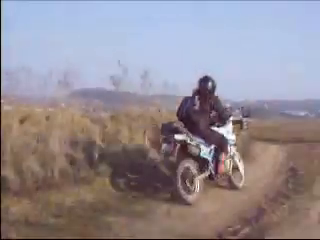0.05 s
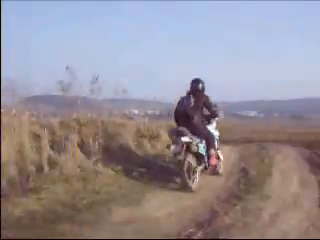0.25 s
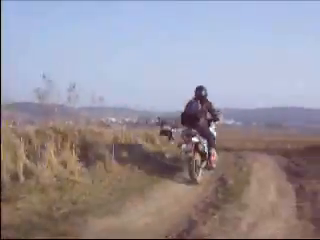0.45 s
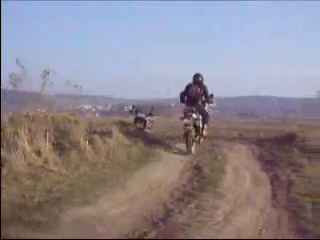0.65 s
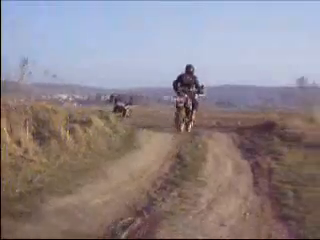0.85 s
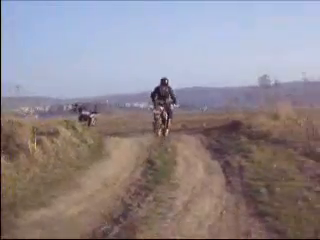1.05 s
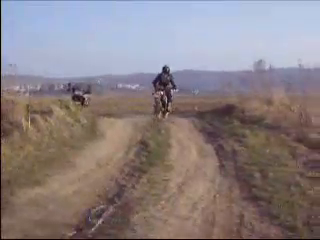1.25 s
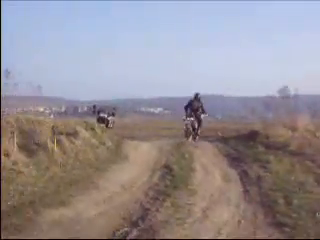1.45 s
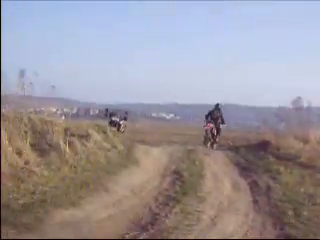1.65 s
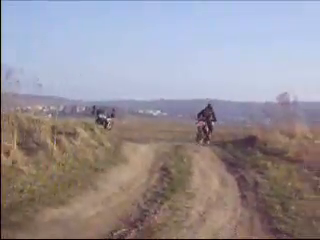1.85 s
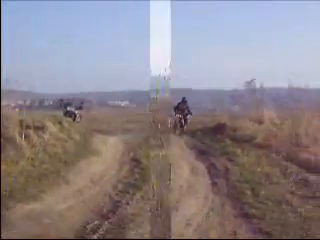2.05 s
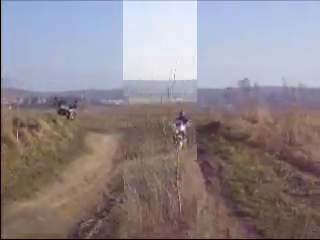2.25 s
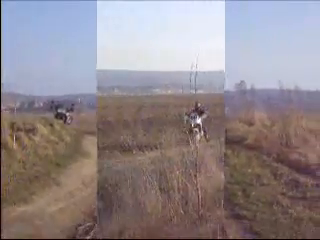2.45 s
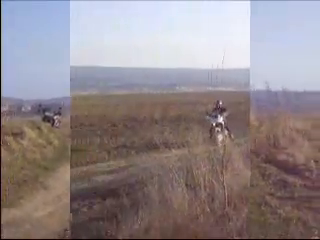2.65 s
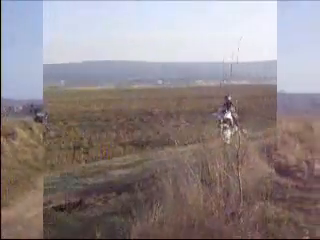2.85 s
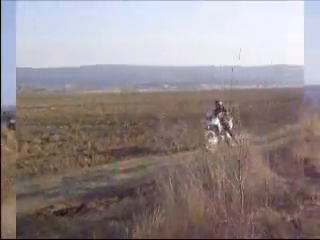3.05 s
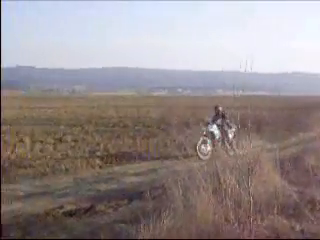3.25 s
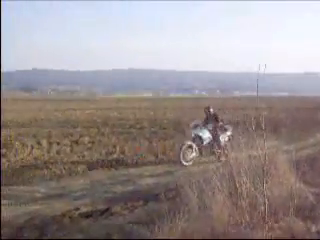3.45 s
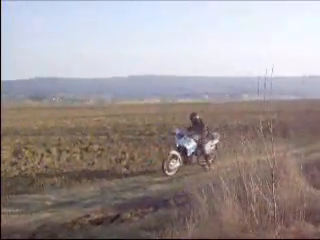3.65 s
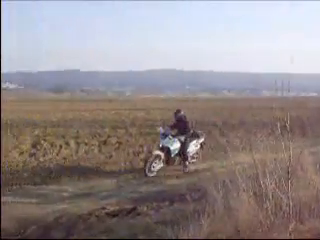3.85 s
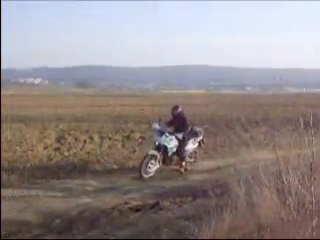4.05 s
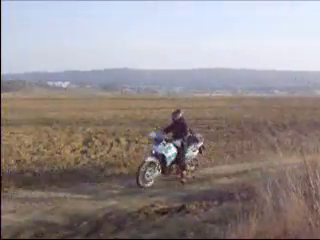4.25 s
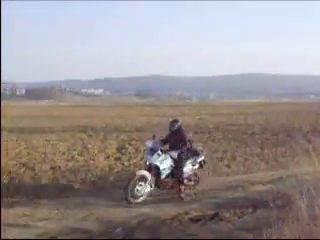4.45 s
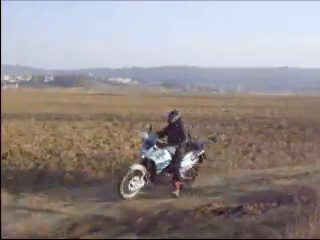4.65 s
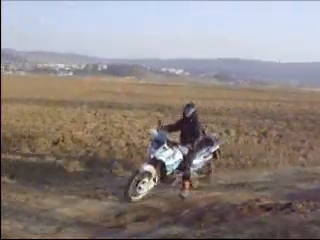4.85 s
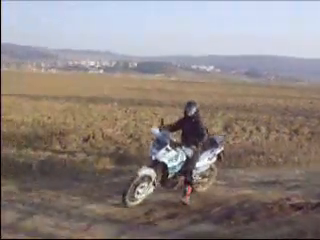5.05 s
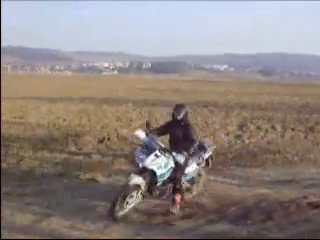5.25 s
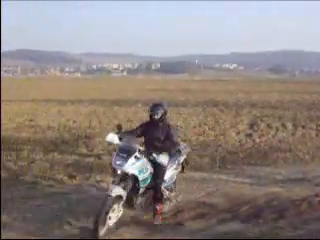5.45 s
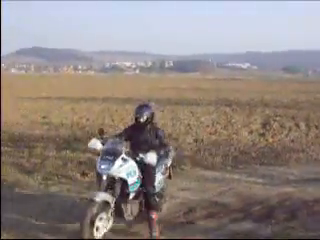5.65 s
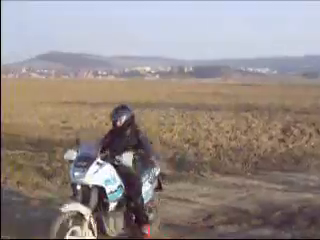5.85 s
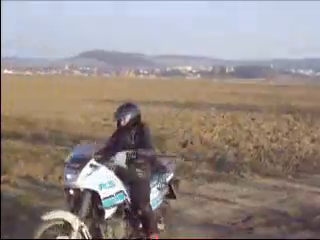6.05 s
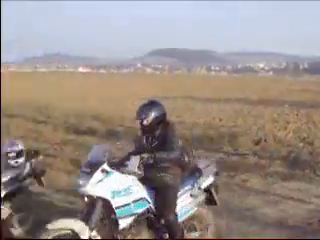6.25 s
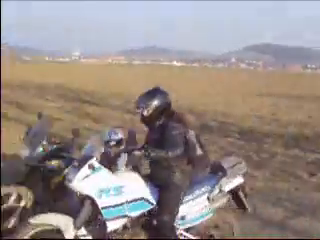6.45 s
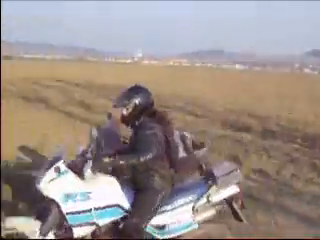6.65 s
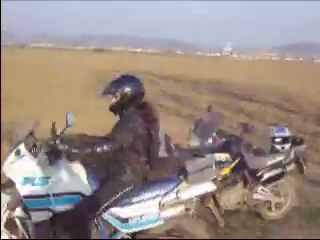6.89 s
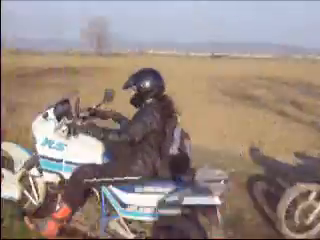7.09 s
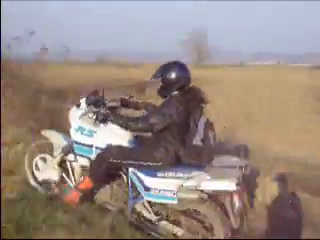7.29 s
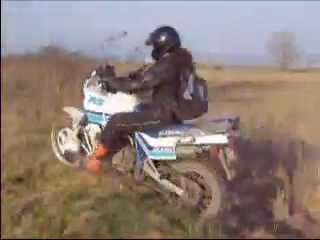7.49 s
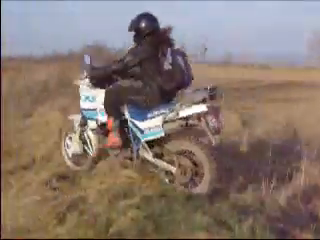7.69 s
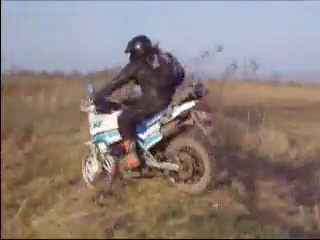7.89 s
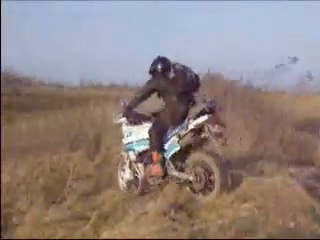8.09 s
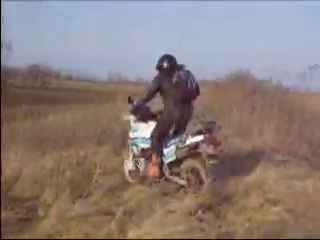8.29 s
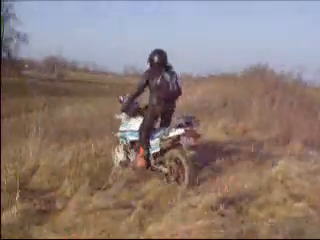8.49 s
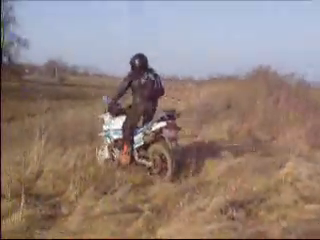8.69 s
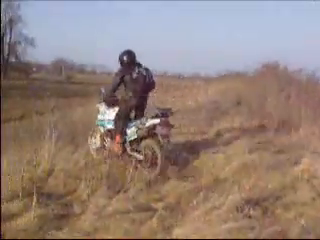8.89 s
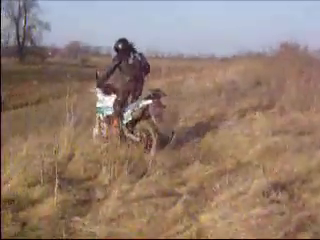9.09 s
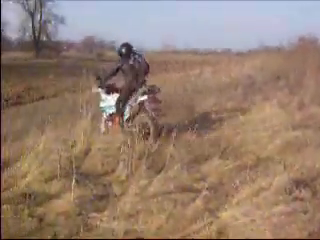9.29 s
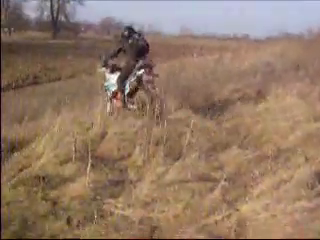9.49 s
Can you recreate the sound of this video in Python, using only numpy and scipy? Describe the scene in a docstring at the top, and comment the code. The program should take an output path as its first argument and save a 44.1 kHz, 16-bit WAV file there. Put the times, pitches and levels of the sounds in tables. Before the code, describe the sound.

A single-cylinder off-road motorcycle thumps away down a dirt track, returns nose-on with honking intake and clatter, then idles off through snapping dry grass.

```python
"""A single-cylinder enduro bike chugs off along a dirt track, tail toward the microphone, each firing a thump and bark.
Then, in a second view, it comes toward us nose-on with airbox honk, clutch rattle and gear clanks.
It passes close by, leaves the track and idles off as dry stalks snap and grass crackles under the tyres.
Pulses and noise bursts follow the engine cycle, and struck modes ring the pipe and metal.
Throughout, valve gear ticks, wind buffets the microphone and a camera whines faintly."""
import sys
import numpy as np
from scipy import signal
from scipy.fft import rfft, irfft, next_fast_len
from scipy.io import wavfile

SR = 44100
rng = np.random.default_rng(int(sys.argv[2]) if len(sys.argv) > 2 else 0)


def materialize(psi):
    """Save the field psi as 16-bit PCM at rate SR to the path in sys.argv[1].

    A 1-D psi becomes a single channel; in a 2-D psi each row is a channel.
    """
    bounded = np.clip(np.atleast_2d(psi).T, -1, 1)
    quanta = np.round(bounded * 32767).astype(np.int16)
    wavfile.write(sys.argv[1], SR, quanta)


N = 420273
TIME = np.arange(N) / SR

# engine speed: t/s, rate/(firings per s)
ENGINE_SPEED = [(0.0, 21.29), (0.48, 18.87), (0.56, 21.09), (0.72, 18.21), (1.65, 12.16), (2.04, 11.8),
                (2.38, 16.78), (3.11, 18.87), (3.57, 26.13), (3.72, 19.87), (4.19, 20.42), (4.51, 16.2),
                (5.91, 12.99), (5.98, 16.46), (6.11, 14.19), (6.87, 17.05), (7.1, 19.93), (7.8, 10.57),
                (7.83, 8.25), (8.4, 13.85), (8.75, 10.62), (9.08, 11.69), (9.16, 7.24), (9.53, 12.07)]
# throttle: t/s, opening/(0-1)
THROTTLE_CURVE = [(0, 0.78), (.23, 0.93), (.35, 0.89), (1.5, 0.5), (2.2, 0.11), (2.5, 0.75), (3.1, 0.87),
                  (3.55, 0.53), (3.68, 0.22), (4.35, 0.36), (4.6, 0.48), (5.3, 0.2), (5.75, 0.62),
                  (5.92, 0.78), (6.45, 0.87), (6.6, 0.81), (6.78, 0.8), (6.9, 0.78), (7.5, 0.75), (7.57, 0),
                  (9.15, 0.29), (9.38, 0.06)]
# distance of the bike: t/s, distance/m
BIKE_DISTANCE = [(0, 4.3), (.35, 7.45), (1.1, 6.86), (1.5, 10.7), (2.15, 12.2), (2.599, 14), (3.05, 10.2),
                 (3.4, 5.7), (4.25, 6.55), (4.65, 3.84), (5.45, 4.13), (6.2, 2.89), (7.35, 3.4),
                 (7.75, 2.67), (8.4, 2.96), (9.5, 3.5)]
# heading: t/s, facing/(0 = tail toward the microphone, 1 = nose toward it)
HEADING = [(0, 0.0092), (1.6, 0.49), (2.4, 0.88), (4.2, 0.83), (5.6, 0.75), (6.2, 0.73), (7.6, 0.27),
           (8.3, 0.5)]
NEAR_M, IDLE_PER_S = 3, 12  # reference distance, and firings per s at idle
# mix of the bike, by part: level/dB (near, idle, throttle shut, tail-on), full throttle adds/dB,
# each firing per s above idle adds/dB, nose-on adds/dB, loss per doubling of distance/dB
PART_LEVELS = { "thump": (-9.5, 8, -0.05, -9.5, 6.5), "bark": (-41, 25, -.5, 1, 7),
               "pipe": (-41, 30.5, -0.5, -8, 13), "crack": (-75, 20, 1.2, 15, 9),
               "intake": (-61.5, 29, 0.26, 7.5, 13), "airbox drone": (-66.5, 13, 1.2, 20, 2),
               "honk": (-83.5, 25, 1.35, 30, 3), "slap": (-45, -2, -.6, 19, 6),
               "crankcase": (-40.5, 7.5, 0.4864, -1.5, 7.5), "head": (-50, 6.5, 0.5, 1, 7),
               "chain": (-47.5, 2, 0.58, 2.5, 7), "fins": (-55, -13.5, 1.85, 5, 8),
               "clutch": (-66, 0, -.7, 35, 8), "throat": (-61, 30, -.3, 8, 13),
               "rear ring": (-39, 20.5, .2, -26, 8), "silencer": (-41.5, 4, 0.41, -10.5, 7), }

# hard or missed firings: t/s, level/dB from normal
STUMBLE_EVENTS = [(.43, 4), (.48, -2.5), (.58, 4), (.65, -1.5), (1.05, -7), (1.99, 6), (3.95, -1),
                  (4.2, -3), (4.38, -10), (5.05, 1), (5.12, -9), (5.54, -5), (6.25, -1), (6.32, 1.5),
                  (6.88, 3), (6.99, -1.5), (9.15, -3), (9.275, 3), (9.38, 2.5)]
STUMBLE_S = .04  # reach to either side
# the bark swings this much more than the thump; chance spread between firings with the throttle shut
STUMBLE_BARK, UNEVEN_DB = 1.97, 2.5
# exhaust gas heat (0-1) per unit of throttle and per firing per s above idle;
# opening below which the throttle adds no heat
HEAT_BY_THROTTLE, HEAT_PER_FIRING_RATE, COOL_THROTTLE = 0.93, 0.053, 0.33
HEAT_PER_DB = 0.12  # a hard firing runs hotter
# silencer reflections in hot gas under load: delay/ms, gain
HOT_ECHOES = [(4.3, -0.14), (7.9, 0.5)]
# silencer reflections in cool gas at idle: delay/ms, gain
COOL_ECHOES = [(5.9, -0.62), (17.2, 0.75)]
# colour of the exhaust bark: f/Hz, relative level/dB
BARK_COLOUR = [(180, 12), (300, 1.5), (420, -41), (540, -4.5), (720, -4), (1000, -16.5), (1500, -17),
               (2500, -36), (5000, -29.5), (12000, -27)]
# exhaust pipe resonances: f/Hz, width/Hz, relative level/dB
PIPE_MODES = [(208, 320, 9), (434, 42.5, -3), (570, 140, -16), (646, 44, -0.5), (810, 160, 0),
              (936, 100, -1.5), (1224, 77, -34), (1440, 190, -15.5), (1970, 340, -17), (2380, 40, -14.5),
              (3500, 570, -15), (4800, 980, -9)]
# pipe modes that ring on toward the rear: f/Hz, width/Hz, relative level/dB
REAR_MODES = [(677, 45, -3), (787, 29, -7), (860, 57, -4.5), (1440, 80, -17), (2030, 70, -12),
              (2620, 100, -14)]
# colour of the combustion crack: f/Hz, relative level/dB
CRACK_COLOUR = [(700, 5), (1200, 1.5), (2100, -3), (3200, -4.5), (4400, -15), (5700, -8), (8000, -28)]

# gulps of air as the throttle is feathered: t/s, level/dB from normal
FEATHERED_GULPS = [(5.9, 1), (5.967, 4.5), (6.032, 1), (6.098, -4), (6.168, 2), (6.303, -1.5), (6.372, 2),
                   (6.437, 3.5), (6.502, 0), (6.81, 4.5)]
# rasp of the intake breath: f/Hz, relative level/dB
BREATH_COLOUR = [(500, -30), (1000, 15.5), (1600, 6), (2400, 8.5), (3500, 0.5), (7000, -1.5), (13000, -23)]
# hiss of the carburettor jet: f/Hz, relative level/dB
JET_COLOUR = [(2200, 0), (3500, 0), (6000, -3), (10000, -8), (13000, -14)]
JET_DB = -3  # hiss against rasp
# carburettor throat resonances: f/Hz, width/Hz, relative level/dB
THROAT_MODES = [(2150, 100, -14), (2545, 100, 2.5), (2680, 72, -14)]
# airbox drone: order/(multiple of the firing rate), relative level/dB
DRONE_ORDERS = [(4, -10), (5, 2), (6, -4)]
# standing waves in the airbox and its duct: f/Hz, width/Hz, relative level/dB,
# sharpening/(share of pitch per firing per s above HONK_RATE)
AIRBOX_MODES = [(266, 28, -1.5, .036), (325, 22, -8, .02), (428, 44, -1.5, .008), (540, 32, -4.5, .01),
                (725, 40, -9, .015), (795, 45, -11, .012)]
HONK_RISE_S, HONK_LAG_S = .0095, .0002  # rise of the lowest wave; lag of the swell behind the firing
HONK_RATE = 20.8  # firings per s above which the honk sharpens
HONK_UNEVEN_DB, HONK_DETUNE = 2, .015  # chance spread of each wave in dB and in share of pitch

# valve gear ticks: place in the cycle/(0-1), relative strength
VALVE_TICKS = [(.09, 0.27), (0.267, 0.44), (0.679, 0.24), (0.799, 0.32)]
# colour of the crankcase: f/Hz, relative level/dB
CRANKCASE_COLOUR = [(150, 12), (250, 0.5), (380, -3.5), (490, -3.5), (620, 0), (850, -1), (1050, -5),
                    (1300, -11), (1800, -12)]
# colour of the cylinder head: f/Hz, relative level/dB
HEAD_COLOUR = [(900, -9), (1250, 4.5), (1500, 1.5), (1750, -3.5), (2050, 7.5), (2300, 2), (2600, 2.5),
               (3100, -3), (3900, -6.5), (5200, -14)]
# rush of chain and tyres: f/Hz, relative level/dB
CHAIN_COLOUR = [(2800, 3), (4000, 4.5), (4800, 6), (6200, 3.5), (7400, 3), (9000, 0.5), (13000, 0)]
# engine case modes under piston slap: f/Hz, width/Hz, relative level/dB
CASE_MODES = [(310, 67, 0), (470, 26, -6.5), (633, 28, -4.5), (790, 89, -15), (950, 77, -11),
              (1520, 100, -19)]
# clutch basket modes: f/Hz, width/Hz, relative level/dB
CLUTCH_MODES = [(1027, 45, -4.5), (1470, 24, -6), (1545, 20, -5), (1650, 40, -8), (1840, 30, -9),
                (1960, 26, -11)]
# the clutch is slipped on the approach and rattles harder: t/s, added level/dB, length/s
SLIPPING_CLUTCH = [(4.95, 6, .38)]
# gearbox modes: f/Hz, width/Hz, relative level/dB
GEAR_MODES = [(665, 88, 1), (783, 51, 1), (1120, 88, -4)]
# gears clank as the drive takes up its slack: t/s, level/dB
GEAR_CLANKS = [(6.074, -31), (6.213, -24.5), (6.282, -25), (6.417, -30)]
# cooling fin modes: f/Hz, width/Hz, relative level/dB
FIN_MODES = [(1963, 67, 13.3), (2540, 83, 5.3), (2670, 72, 3.3), (3390, 95, 5.4), (4570, 160, 3.8),
             (5500, 110, 2.5), (7300, 86, 4)]
# hollow silencer outlet modes: f/Hz, width/Hz, relative level/dB
TAILPIPE_MODES = [(615, 27, 4), (664, 32, 1.5), (795, 30, 6.5), (875, 38, -8), (1390, 104, -6),
                  (2180, 250, -17)]
# chassis knocks over ruts: t/s, level/dB
RUT_KNOCKS = [(1.626, -35.5), (3.716, -29.5), (3.81, -33), (3.931, -40), (4.076, -38), (4.238, -32),
              (4.326, -25.5), (4.361, -23.5), (4.398, -27.5), (9.22, -40), (9.25, -36), (9.379, -35)]
# colour of the chassis knocks: f/Hz, relative level/dB
KNOCK_COLOUR = [(200, 14), (380, 7.5), (550, 9.5), (800, 1.5), (1050, -7), (1500, -10)]

# snapping stalks and stones: t/s, level/dB before trim and filter, f/Hz that places the band
STALK_SNAPS = [(0.704, -22.5, 2390), (1.2795, -27.5, 4900), (5.2916, -36, 5990), (7.427, -13, 2700),
               (7.863, -5.5, 5900), (7.867, -1, 12400), (7.9898, -6, 5250), (8.1815, -17.5, 5790),
               (8.257, -16.5, 5850), (8.411, -24, 12000), (8.474, -23.5, 12000), (8.6693, -27, 8890),
               (9.0809, -12.5, 3480), (9.233, -26, 3690), (9.2512, -9, 4500), (9.256, -17, 4500),
               (9.2735, -18.5, 4500), (9.291, -20, 6000), (9.309, -24, 5500), (9.324, -19, 4000),
               (9.34, -24, 4000), (9.3483, -14, 3500), (9.355, -24, 7000), (9.361, -13, 3950),
               (9.376, -14.5, 2960)]
LEAVES_TRACK_S = 7.15
TRACK_DB, GRASS_DB = -75, -44.5  # tyre crackle on dirt and in grass, near and before trim
# crushed tufts of dry grass: t/s, level/dB before trim, length/s
GRASS_TUFTS = [(7.35, -49, 0.056), (8.025, -35.5, 0.025), (8.21, -38, 0.082), (8.65, -32, 0.042),
               (8.8, -42.5, 0.064), (9.08, -46, 0.12), (9.26, -43, 0.13), (9.36, -42, 0.027)]
# bands of grass clicks: f/Hz, relative level/dB
CRACKLE_BANDS = [(2500, -9.5), (4000, -7), (6000, -2), (8000, -4), (10000, -5.5), (12000, -3)]
# tall brush sweeping along the bike: t/s, level/dB, length/s
BRUSH_SWEEPS = [(8.375, -43, 0.013), (9.24, -41, 0.03), (9.3, -44, 0.029), (9.365, -41, 0.021)]
# colour of the brush rustle: f/Hz, relative level/dB
RUSTLE_COLOUR = [(400, -3), (800, 6), (1400, 5), (2300, 9), (4500, 4), (8000, -10), (13000, -10)]

BREEZE_DB = -36.5  # steady wind on the microphone, before trim
# slow gusts: t/s, level/dB before trim, length/s
WIND_GUSTS = [(.5, -38, 0.96), (1.55, -33.5, 0.31), (1.97, -25, 0.083), (2.3, -34.5, 0.099),
              (3.95, -33, 0.54), (5.22, -30, 0.22), (6.68, -35, 0.049)]
# sharp buffets: t/s, level/dB before trim, length/s
WIND_BUFFETS = [(1.6, -28.5, 0.031), (1.632, -25, 0.01), (1.92, -39, 0.019), (1.997, -23, 0.027),
                (3.82, -24, 0.026), (4.075, -21, 0.025), (4.155, -24.5, 0.049), (5.04, -34, 0.023),
                (5.302, -21, 0.0068), (5.63, -25, 0.038)]
# colour of the wind rumble: f/Hz, relative level/dB
RUMBLE_COLOUR = [(18, -8.5), (35, 2), (60, -8), (100, -12), (200, -29), (400, -36.5), (1000, -54.5)]
# colour of the buffets: f/Hz, relative level/dB
BUFFET_COLOUR = [(25, -49), (65, 8.5), (110, -4.5), (200, -6.5), (400, -17), (580, -28.5), (800, -59),
                 (2500, -37)]
# single eddies on the microphone port: t/s, peak level/dB, half length/ms
EDDY_POPS = [(1.6271, -10.5, 1.1), (2.014, -19, 0.91), (3.93, -7.5, 0.99), (4.085, -9.5, 1),
             (4.156, -16, 2.1)]
CUTOFF_HZ = 13000


def exhaust(firings, strength, load_hz=118, idle_hz=100, idle_share=1.0, load_boom=0.22, idle_boom=1.0):
    """Each blow-down gives a thump, a slow boom and a burst of turbulence; hot gas makes it shorter."""
    age = np.arange(-SR // 50, SR // 10) / SR
    thumps, bark_gate = np.zeros(N), np.zeros(N)
    loaded = puff(age, load_hz, HOT_ECHOES) + load_boom * boom(age, start=0.0139)
    idling = puff(age + 0.001, idle_hz, COOL_ECHOES) + idle_boom * boom(age, start=0.0231)
    rasp = burst(age - .0015, .002, .007)
    throttle, = in_time(THROTTLE_CURVE, firings)
    speed, = in_time(ENGINE_SPEED, firings)
    heats = HEAT_BY_THROTTLE * np.maximum(throttle - COOL_THROTTLE, 0)
    heats = heats + HEAT_PER_DB * strength + HEAT_PER_FIRING_RATE * (speed - IDLE_PER_S)
    heats = np.clip(heats, 0, 1)
    thump_db = part_db("thump", firings) + strength
    bark_db = part_db("bark", firings) + STUMBLE_BARK * strength
    for s, heat, thump, bark in zip(firings, heats, thump_db, bark_db):
        blend = heat * loaded + (1 - heat) * idle_share * idling
        add(thumps, s + age[0], from_db(thump) * blend)
        add(bark_gate, s + age[0], from_db(bark) * rasp)
    return thumps + bark_gate * noise(BARK_COLOUR)


def puff(age, hz, echoes):
    """A pressure hump flanked by suction, followed by its reflections."""
    out = 0
    for ms, gain in [(0.094, 0.99)] + echoes:  # the direct hump comes first
        u = (np.pi * hz * (age - ms / 1000)) ** 2
        out = out + gain * (1 - 2 * u) * np.exp(-u)
    return out


def boom(age, start, hz=36, decay=0.0047):
    """The gas in the silencer swings slowly after a puff, suction first."""
    late = np.maximum(age - start, 0)
    return -np.sin(2 * np.pi * hz * late) * np.exp(-late / decay)


def tailpipe_ring(firings, strength, lag=0.00035, return_s=.0062):
    """The opening valve rings the pipe, sagging as pressure falls; the returning wave rings it again."""
    levels = part_db("pipe", firings) + STUMBLE_BARK * strength
    again = part_db("rear ring", firings) + strength
    first_ring = struck(firings + lag, levels, PIPE_MODES, uneven_db=3, detune=.025, sag=.15)
    return first_ring + struck(firings + return_s, again, REAR_MODES, uneven_db=3, detune=.025)


def firing_strength(firings):
    """Decibels by which each firing departs from normal; an open throttle steadies the engine."""
    throttle, = in_time(THROTTLE_CURVE, firings)
    chance = UNEVEN_DB * (1 - .5 * throttle) * rng.standard_normal(len(firings))
    return chance + sum(db * (abs(firings - s) < STUMBLE_S) for s, db in STUMBLE_EVENTS)


def combustion(firings, spread_s=.004, count=4):
    """Each firing cracks in a quick volley of sharp pressure spikes, louder under load."""
    spikes = np.zeros(N)
    for s in firings:
        for delay, size in rng.random((count, 2)):
            add(spikes, s + spread_s * delay, np.array([size + .5]))
    return from_db(part_db("crack")) * coloured(spikes, CRACK_COLOUR)


def intake(cycles, speed, place=0.765):
    """Air rushes through the carburettor once a cycle: a sudden start, a changing share of rasp and hiss."""
    gulp = burst(cycle_age(cycles, speed, place), .0012, .011)
    feathered = sum(db * (abs(TIME - s) < .03) for s, db in FEATHERED_GULPS)
    rasp = from_db(1.8 * drift(14)) * noise(BREATH_COLOUR)
    hiss = from_db(1.8 * drift(14)) * noise(JET_COLOUR)
    return from_db(part_db("intake") + feathered) * gulp * (rasp + from_db(JET_DB) * hiss)


def throat_ring(cycles, place=0.84):
    """Gulps of air set the carburettor throat ringing brightly, some far more than others."""
    gulps = passings(cycles, place)
    chance = np.minimum(5 * rng.standard_normal(len(gulps)), 5)
    return struck(gulps, part_db("throat", gulps) + chance, THROAT_MODES, uneven_db=4, detune=.025)


def airbox(cycles, firings):
    """Standing waves honk once a cycle, never twice alike, over a drone of engine orders; load lifts both."""
    honks, age = np.zeros(N), np.arange(-SR // 40, SR // 15) / SR
    hz, width, db, sharpens = np.transpose(AIRBOX_MODES)[:, :, None]
    swell = burst(age, HONK_RISE_S * np.sqrt(hz[0] / hz), 1 / (np.pi * width))
    shapes = from_db(db) * swell
    rates, = in_time(ENGINE_SPEED, firings)
    for s, rate, level in zip(firings, rates, part_db("honk", firings)):
        share, stray = rng.standard_normal((2, len(AIRBOX_MODES), 1))
        pitch = 1 + sharpens * max(rate - HONK_RATE, 0) + HONK_DETUNE * stray
        waves = from_db(HONK_UNEVEN_DB * share) * shapes * np.cos(2 * np.pi * hz * pitch * age)
        add(honks, s + HONK_LAG_S + age[0], from_db(level) * waves.sum(axis=0))
    drone = sum(from_db(db) * np.cos(2 * np.pi * order * cycles) for order, db in DRONE_ORDERS)
    return from_db(part_db("airbox drone")) * drone + honks


def running_gear(cycles, speed):
    """Valve ticks shake the cases and the head over the wavering rush of chain and tyres."""
    ticks = 0
    for place, size in VALVE_TICKS:
        tick = burst(cycle_age(cycles, speed, place), .001, .006)
        ticks = ticks + size * tick * from_db(2 * drift(25))
    rattle = rms_one((.36 + ticks) * from_db(1.3 * drift(9)))
    layers = [("crankcase", CRANKCASE_COLOUR), ("head", HEAD_COLOUR), ("chain", CHAIN_COLOUR)]
    return rattle * sum(from_db(part_db(name)) * noise(colour) for name, colour in layers)


def clatter(cycles, slap_place=.765, clutch_place=.27):
    """The piston slaps the cases as compression builds; the clutch rings each crank turn; gears clank."""
    slaps = passings(cycles, slap_place)
    rattles = passings(2 * cycles, 2 * clutch_place)  # two crank turns per cycle
    slip = sum(db * np.exp(-((rattles - s) / length) ** 2) for s, db, length in SLIPPING_CLUTCH)
    loose = np.minimum(3.5 * rng.standard_normal(len(rattles)), 6)
    clutch_db = part_db("clutch", rattles) + slip + loose
    piston = struck(slaps, part_db("slap", slaps), CASE_MODES, uneven_db=3, detune=.03)
    clutch = struck(rattles, clutch_db, CLUTCH_MODES, uneven_db=5, detune=.04)
    gears = struck(*np.transpose(GEAR_CLANKS), GEAR_MODES, uneven_db=2, detune=.02)
    return piston + clutch + gears


def bodywork(cycles, speed):
    """Each firing shakes the fins at the front and breathes a hollow puff from the silencer at the rear."""
    white = rng.standard_normal((2, N))
    shake = rms_one(1 + 2.6 * burst(cycle_age(cycles, speed, .04), .0015, .007))
    waver = 1 + .0025 * (speed - IDLE_PER_S) + .008 * drift(11)  # the ring sharpens with the revs and wanders
    fins = bent(rms_one(resonate(white[0], FIN_MODES)), waver)
    outflow = rms_one(.27 + burst(cycle_age(cycles, speed, 0), .014, .026))
    silencer = outflow * rms_one(resonate(white[1], TAILPIPE_MODES))
    return from_db(part_db("fins")) * shake * fins + from_db(part_db("silencer")) * silencer


def chassis(rise=0.0024, decay=0.0084):
    """The suspension knocks dully in the ruts."""
    gate, age = np.zeros(N), np.arange(-SR // 100, SR // 12) / SR
    for s, db in RUT_KNOCKS:
        add(gate, s + age[0], from_db(db) * burst(age, rise, decay))
    return gate * noise(KNOCK_COLOUR)


def snaps(snap_db=-2.0, crack_s=0.00094, splinter_s=0.006, splinter_db=-15):
    """A thick stalk cracks at once and splinters for a few milliseconds."""
    out, age = np.zeros(N), np.arange(SR // 30) / SR
    decay = np.exp(-age / crack_s) + from_db(splinter_db) * np.exp(-age / splinter_s)
    for s, db, hz in STALK_SNAPS:
        edges = [hz * .6, min(hz * 2.4, CUTOFF_HZ)]
        band = signal.butter(1, edges, "band", fs=SR, output="sos")
        splinters = rng.standard_normal(len(age)) * decay
        add(out, s, from_db(db + snap_db) * signal.sosfilt(band, splinters))
    return out


def grass(grass_db=-6, rustle_db=0):
    """Grit and dry blades break in clumps of tiny clicks of many pitches; tall brush rustles along the bike."""
    surface_db = np.where(TIME < LEAVES_TRACK_S, TRACK_DB, GRASS_DB)
    ground = from_db(surface_db) * NEAR_M / in_time(BIKE_DISTANCE)[0]
    clumps, crackle = from_db(6 * drift(55)), 0
    for hz, db in CRACKLE_BANDS:
        born = rng.random(N) < 350 * clumps / SR  # about 350 clicks per s, times the clumping
        sizes = from_db(5.5 * np.minimum(rng.exponential(1, N), 3.3)) * rng.choice([-1, 1], N)
        clicks = resonate(born * sizes + 1e-18, [(hz, hz / 4, 0)])
        crackle = crackle + from_db(db) * rms_one(clicks)
    tyres = from_db(grass_db) * (ground + swells(GRASS_TUFTS)) * crackle
    scrape = rms_one(from_db(4 * drift(220)))
    return tyres + from_db(rustle_db) * swells(BRUSH_SWEEPS) * scrape * noise(RUSTLE_COLOUR)


def wind(wind_db=4.5, buffet_db=-1.0):
    """Lumpy pressure on the microphone port; hard buffets reach higher in pitch."""
    flow = from_db(BREEZE_DB) + swells(WIND_GUSTS)
    rumble = from_db(wind_db) * flow * noise(RUMBLE_COLOUR)
    return rumble + from_db(buffet_db) * swells(WIND_BUFFETS) * noise(BUFFET_COLOUR)


def pops():
    """An eddy that hits the port squarely gives one short hump of pressure."""
    out, age = np.zeros(N), np.arange(-SR // 100, SR // 100) / SR
    for s, db, ms in EDDY_POPS:
        add(out, s + age[0], from_db(db) / np.cosh(age * 1000 / ms) ** 2)
    return out


def camera(hz=4942, whine_db=-62, hiss_db=-57):
    """A thin, slightly unsteady electronic whine over a faint hiss."""
    whine = from_db(1.5 * drift(8)) * np.sin(2 * np.pi * hz * TIME + .9 * drift(30))
    return from_db(whine_db) * whine + from_db(hiss_db) * rng.standard_normal(N)


def part_db(name, at=TIME):
    """Level of one part of the bike, from throttle, engine speed, heading and distance."""
    base, by_throttle, by_speed, by_facing, per_doubling = PART_LEVELS[name]
    curves = (THROTTLE_CURVE, ENGINE_SPEED, HEADING, BIKE_DISTANCE)
    throttle, speed, facing, metres = (in_time(curve, at)[0] for curve in curves)
    driven = base + by_throttle * throttle + by_speed * (speed - IDLE_PER_S)
    return driven + by_facing * facing - per_doubling * np.log2(np.maximum(metres, 1) / NEAR_M)


def cycle_age(cycles, speed, place):
    """Seconds from the nearest passing of a place in the engine cycle."""
    return ((cycles - place + .5) % 1 - .5) / speed


def passings(cycles, place):
    """Times at which the engine passes a place in its cycle."""
    return TIME[1:][np.diff(np.floor(cycles - place)) > 0]


def struck(times, levels, modes, uneven_db, detune, sag=0):
    """Blows ring a set of modes, each with other strengths, pitches and tails; the pitch may start high and sag."""
    out, age = np.zeros(N), np.arange(SR // 12) / SR
    hz, width, db = np.transpose(modes)[:, :, None]
    signs = (-1) ** np.arange(len(modes))[:, None]  # neighbouring modes swing in opposite phase
    swing = age + sag * .004 * (1 - np.exp(-age / .004))
    # the colour varies, the energy of a blow holds
    usual = np.sum((from_db(db) * np.exp(-np.pi * width * age)) ** 2) / 2
    for s, level in zip(times, levels):
        share, pitch, damping = rng.standard_normal((3, len(modes), 1))
        tails = np.exp(-np.pi * width * from_db(2.5 * damping) * age)
        waves = np.sin(2 * np.pi * hz * (1 + detune * pitch) * swing)
        rings = signs * from_db(db + uneven_db * share) * waves * tails
        blow = rings.sum(axis=0)
        add(out, s, from_db(level) * blow * np.sqrt(usual / np.sum(blow ** 2)))
    return out


def resonate(x, modes):
    """Parallel resonances, each with its own gain on top."""
    out = 0
    for hz, width, db in modes:
        r = np.exp(-np.pi * width / SR)
        edge = (1 - r * r) / 2
        poles = [1, -2 * r * np.cos(2 * np.pi * hz / SR), r * r]
        out = out + from_db(db) * signal.lfilter([edge, 0, -edge], poles, x)
    return out


def coloured(x, points):
    """Give a signal a spectrum that rolls off beyond both ends; unit power."""
    hz, db = np.transpose(points)
    size = next_fast_len(N)
    f = np.maximum(np.arange(size // 2 + 1) * SR / size, 1)
    gain = from_db(np.interp(np.log(f), np.log(hz), db))
    gain = gain / np.hypot(1, (hz[0] / f) ** 4) / np.hypot(1, (f / hz[-1]) ** 4)
    return rms_one(irfft(rfft(x, size) * gain, size)[:N])


def noise(points):
    """Coloured noise of unit power."""
    return coloured(rng.standard_normal(N), points)


def bent(x, pitch):
    """Play a steady sound at a moving relative pitch."""
    return np.interp(np.cumsum(pitch) % N, np.arange(N), x)


def drift(per_s):
    """Slow chance with a spread near 1, from random points joined by lines."""
    return np.interp(TIME * per_s, np.arange(2000), rng.standard_normal(2000))


def burst(age, rise, decay):
    """A swell up to age zero, then an exponential fall."""
    return np.exp(-(np.minimum(age, 0) / rise) ** 2 - np.maximum(age, 0) / decay)


def swells(rows):
    """A smooth rise and fall for each row of time, level and length."""
    return sum(from_db(db) * np.exp(-((TIME - s) / length) ** 2) for s, db, length in rows)


def in_time(rows, at=TIME):
    """Each column of a curve at the given times."""
    s, *columns = np.transpose(rows)
    return [np.interp(at, s, c) for c in columns]


def add(out, at, sound):
    """Mix a short sound in at a time."""
    i = int(round(at * SR))
    a, b = max(i, 0), min(i + len(sound), N)
    if b > a:
        out[a:b] += sound[a - i:b - i]


def from_db(db):
    """Decibels to gain."""
    return 10 ** (np.asarray(db) / 20)


def rms_one(x):
    """Scale to unit power."""
    return x / np.sqrt(np.mean(x ** 2) + 1e-20)


def scene():
    """The engine cycle times the firings and the moving parts; ground, wind and camera lie around it."""
    speed, = in_time(ENGINE_SPEED)
    cycles = np.cumsum(speed) / SR - .65
    firings = passings(cycles, 0)
    strength = firing_strength(firings)
    gas = exhaust(firings, strength) + tailpipe_ring(firings, strength)
    gas = gas + intake(cycles, speed) + throat_ring(cycles) + airbox(cycles, firings)
    metal = running_gear(cycles, speed) + combustion(firings) + clatter(cycles)
    metal = metal + bodywork(cycles, speed) + chassis()
    ground = grass() + snaps()
    background = wind() + pops() + camera()
    return (gas + metal + ground + background)[None]


def record(dry):
    """A steep elliptic low-pass cuts the top."""
    steep = signal.ellip(10, .3, 80, CUTOFF_HZ, fs=SR, output="sos")
    return signal.sosfilt(steep, dry)


dry = scene()
out = record(dry)
materialize(out)
```